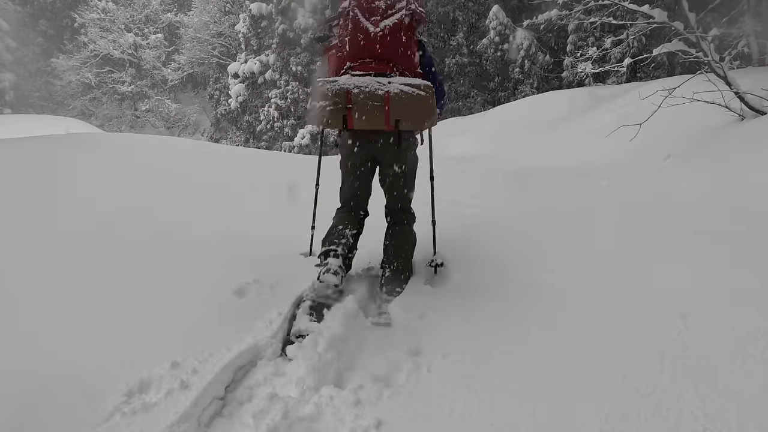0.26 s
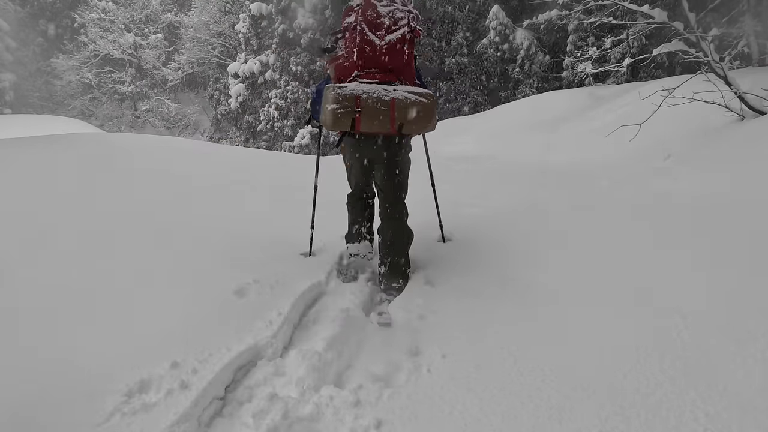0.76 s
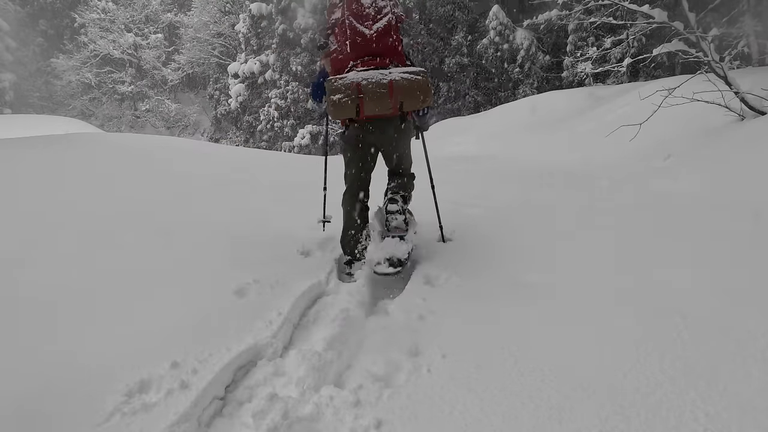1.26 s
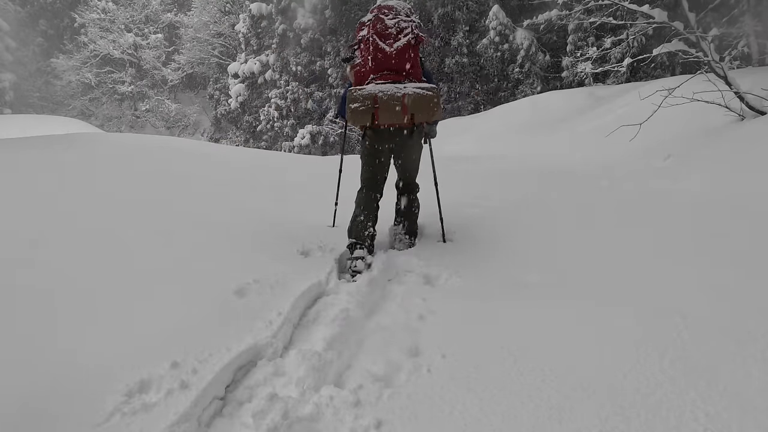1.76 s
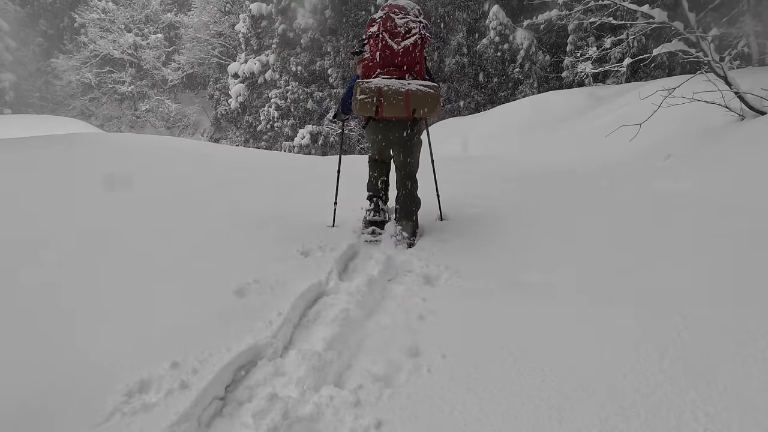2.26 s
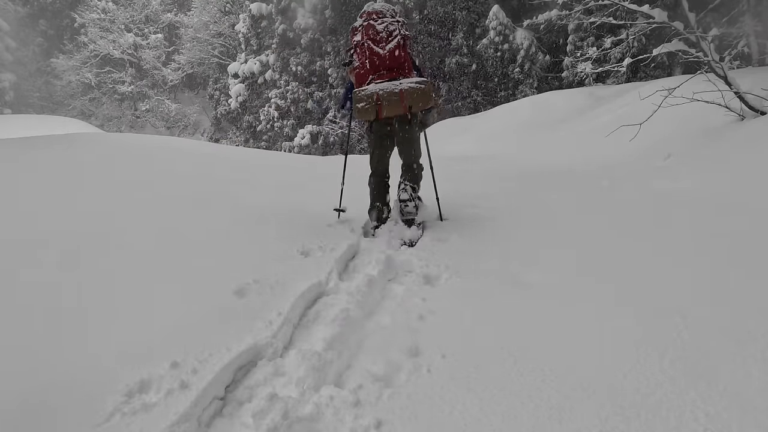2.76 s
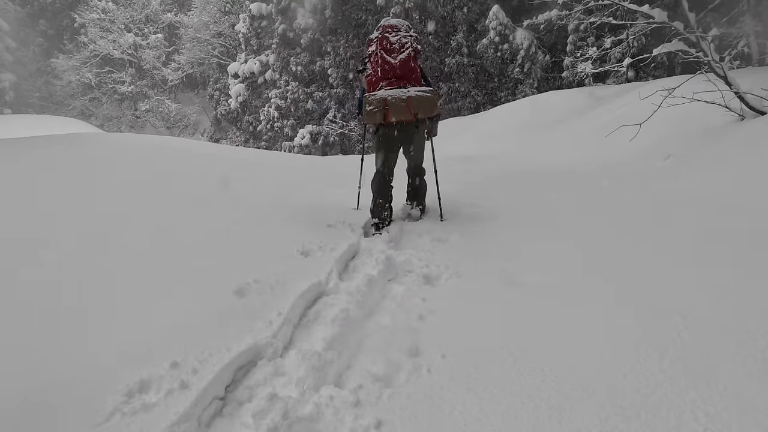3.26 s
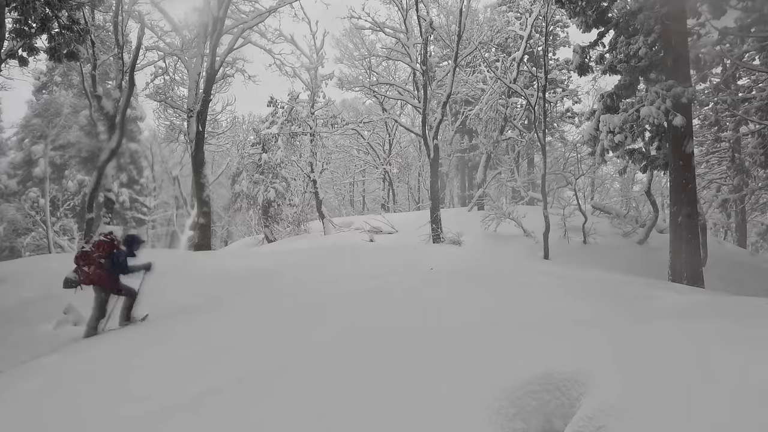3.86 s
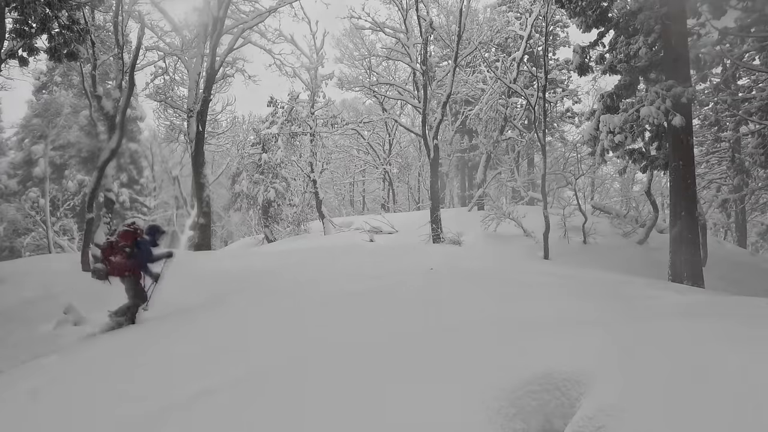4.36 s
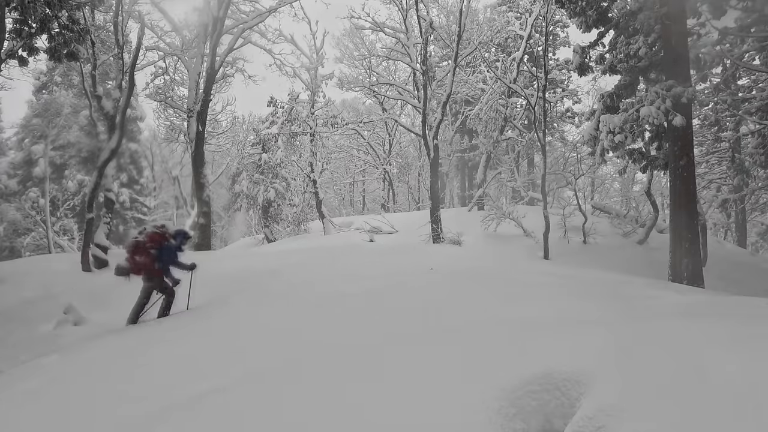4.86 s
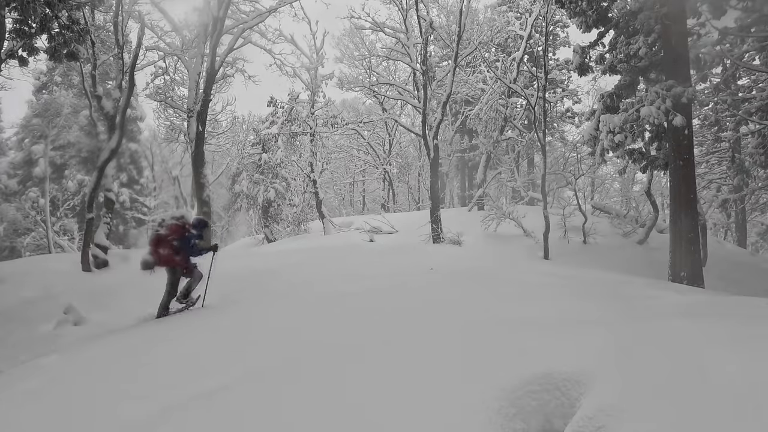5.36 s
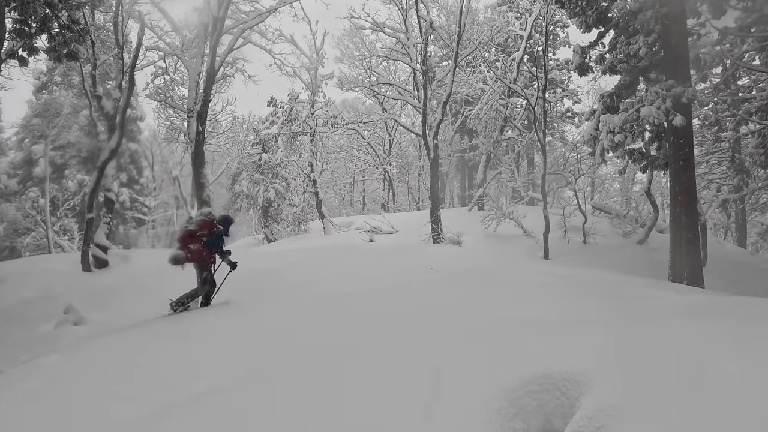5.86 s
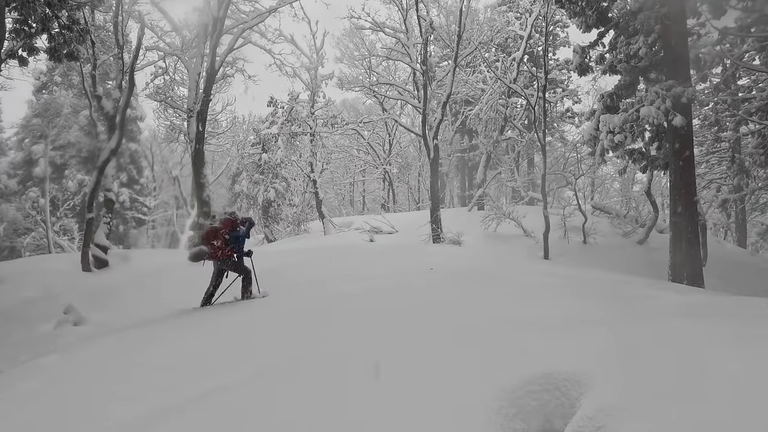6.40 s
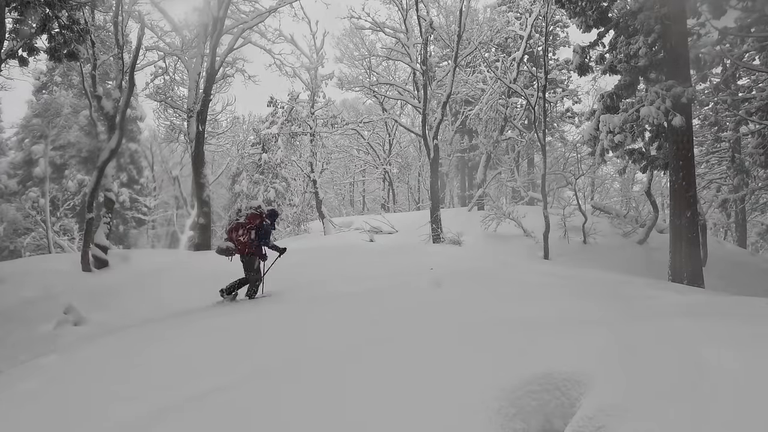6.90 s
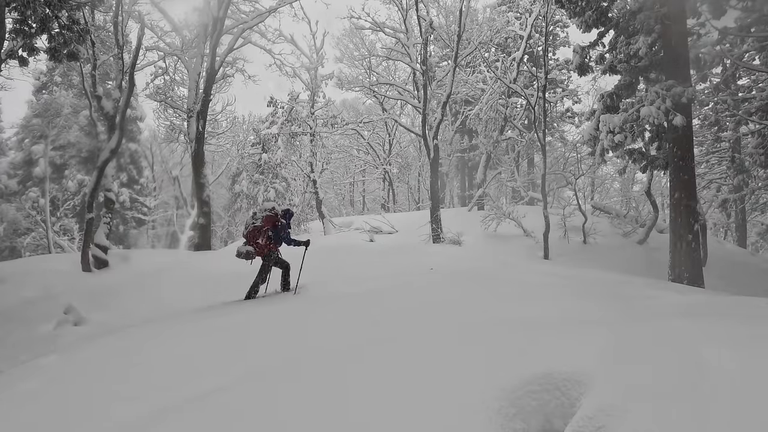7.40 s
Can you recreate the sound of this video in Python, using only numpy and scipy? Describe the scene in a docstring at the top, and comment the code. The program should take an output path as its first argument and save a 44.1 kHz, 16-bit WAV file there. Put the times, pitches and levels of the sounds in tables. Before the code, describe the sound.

Close to the microphone, snowshoes press slowly into deep powder, each step a deep bassy thump under a muffled, granular crunch. Snowfall hisses softly and clumps tick sharply on the microphone housing, with two dull knocks and a tiny chirp early on. After a soft fabric swish, the place changes abruptly to a distant wooded slope: very faint crunches, thinner hiss, small ticks and brief low wind rumbles. No echo.

```python
"""A hiker on snowshoes walks away through deep powder: each step is a deep thump under a muffled crunch. The
steps are runs of small collapses made from filtered clicks; larger slumps are single low swings. Snow hisses
all around as filtered noise; clumps tick on the microphone's housing and ring it, and his poles knock dully now
and then. A tiny chirp comes early, and a soft swish of fabric just before the place changes. Then, at once, he
is far off on a wooded slope: faint steps, a thinner hiss, more ticks and rumbling gusts."""
import sys
import numpy as np
from scipy import signal
from scipy.fft import rfft, irfft, next_fast_len
from scipy.io import wavfile
from scipy.ndimage import uniform_filter1d

SR = 44100
rng = np.random.default_rng(int(sys.argv[2]) if len(sys.argv) > 2 else 0)


def log_audio(samples):
    """Write samples as a 16-bit WAV file to the path given in sys.argv[1]."""
    # one column per channel
    frames = np.atleast_2d(samples).T
    # limit to full scale, then quantise
    limited = np.clip(frames, -1, 1)
    pcm = np.round(limited * 32767).astype(np.int16)
    wavfile.write(sys.argv[1], SR, pcm)


N = 336924
TIME = np.arange(N) / SR  # seconds
SLOPE_S = 3.585  # the trail gives way to the far slope
TOP_HZ = 15800  # nothing much is heard above this

# Near steps, levels before the trims in near_steps: touch_down_s, press_s (to about full weight),
# rest_s (from there to rest), thump_db, crunch_db, swish_db, touch_db (against full weight),
# ease_db (change after touch-down)
NEAR_STEPS = [ (-0.01, 0.091, 0.14, -21, -28, -50.5, -15.5, 4),
              (0.769, 0.12, 0.014, -23.5, -30.5, -43, -8, -5.5),
              (1.629, 0.11, 0.049, -26, -34, -41.5, -1, -6),
              (2.407, 0.22, 0.033, -25, -33.5, -49, -8.5, -7.5),
              (3.23, .13, 0.025, -28.5, -36.5, -45.5, -6.5, -2)]
# Snow giving way under a snowshoe, before the trim in slumps: centre_s, peak_db, pitch_hz
SLUMPS = [(0.056, -11.5, 43), (0.096, -16.5, 86), (0.136, -20, 67), (0.174, -31, 108), (0.846, -25, 62),
          (0.878, -15, 81.5), (1.657, -22, 115), (1.718, -19.5, 55), (1.77, -20.5, 80), (2.523, -21.5, 143),
          (2.598, -29, 65), (2.617, -20.5, 85), (3.246, -24.5, 265), (3.33, -26, 40.4), (3.367, -22.5, 80)]
# Faint steps on the slope, before the trim in far_steps: centre_s, length_s, crunch_db
FAR_STEPS = [(3.66, 0.061, -66), (4.024, 0.026, -53.5), (4.203, 0.026, -59), (4.556, 0.029, -55),
             (4.759, 0.032, -59), (5.21, 0.12, -70), (5.599, .035, -58), (5.717, 0.085, -60.5),
             (6.219, 0.054, -66), (6.612, 0.032, -54.5), (6.72, 0.053, -54), (6.917, 0.11, -66.5),
             (7.298, .06, -66.5), (7.6, 0.085, -58)]
# Snow striking the housing, before the grille: start_s, level_db, contact_s, ring_hz (of the struck spot),
# body_db and thud_db (both relative to level_db)
TICKS = [(0.044, -47, 0.0086, 1010, 11, 9), (0.0676, -18, 0.0029, 3100, -14, -10.5),
         (.1029, -27.5, 0.0041, 3500, -12, -18), (.235, -38, 0.00099, 5100, -6.5, -10),
         (0.2755, -49, 0.0082, 7300, -18, -23), (0.2866, -37.5, .0024, 4000, -19, -28),
         (.2953, -43.5, 0.0017, 7750, -5, -2), (0.4088, -46, 0.0053, 4400, -0.5, -2),
         (0.5638, -50, 0.0014, 1660, 2, -1), (0.5716, -47, 0.0014, 5000, -1.5, -2),
         (0.7665, -48.5, .0087, 1100, 13.5, -10), (.8559, -28, 0.004, 5200, -2, -25),
         (0.9633, -30.5, 0.0041, 3930, -3, -7.5), (.9759, -55, 0.00062, 4370, -11, -5),
         (1.0733, -42.5, 0.0013, 5600, -5, -12), (1.0781, -37.5, 0.0018, 5800, -15, -11),
         (1.1228, -43, 0.0043, 5640, -1, -4), (1.1385, -43, 0.0016, 5800, -17, -13),
         (1.1525, -35, 0.0089, 4960, -6, -7.5), (1.488, -50.5, 0.0049, 1090, 3.5, -5),
         (1.6567, -36.5, 0.0031, 5760, -0.5, -14), (1.9494, -41.5, 0.0034, 1480, -1, -8),
         (1.956, -46, 0.0042, 2860, -1, -22), (1.9911, -54.5, .001, 7940, -7, -17),
         (2.0686, -35, 0.0016, 5070, -7, -9.5), (2.181, -49, 0.0046, 5400, 1.5, -8),
         (2.403, -52, .0054, 1746, 12.5, -4), (2.413, -43.5, 0.0045, 2900, -11, 3.5),
         (2.6011, -40.5, 0.0018, 5670, -1.5, -22), (2.6308, -28.5, 0.0033, 4400, -4.5, -6.5),
         (2.747, -50, 0.0057, 1310, 6.5, -13), (2.9628, -34, 0.003, 4180, -2.5, -16),
         (3.0223, -44.5, 0.0013, 5570, -9, -28), (3.036, -44.5, 0.0062, 4500, -2, -8),
         (3.201, -58.5, .001, 7400, -12, -20), (3.2223, -51.5, 0.0028, 1850, 10.5, -9),
         (3.3046, -46.5, 0.0018, 5900, 2, -1), (3.361, -48.5, 0.0015, 7760, -22, -19),
         (3.502, -34.5, .0045, 7800, -6.5, -4.5), (3.566, -48.5, .0007, 5000, -10, -19),
         (3.6141, -42, 0.00054, 6400, -2, -12), (3.713, -46.5, 0.00032, 2350, 5.5, -8),
         (3.7424, -41.5, 0.0045, 1960, 3.5, -3), (3.8491, -56.5, .0011, 6340, -15, -14),
         (3.932, -49, 0.00062, 2530, -7, -13), (3.9647, -46.5, 0.0017, 7100, 0, -25),
         (3.9723, -45.5, 0.00042, 4670, -1, -37), (4.0862, -58, 0.00057, 7300, 3, -26),
         (4.1275, -49.5, 0.0007, 5800, -7, -28), (4.2507, -55.5, 0.00077, 7460, -16, -19),
         (4.3014, -53, 0.00058, 4660, -3, -33), (4.308, -50, 0.00068, 7550, 1, 4),
         (4.3694, -50, 0.0017, 4430, -5, -25), (4.4063, -43.5, 0.00076, 4230, -2.5, -11),
         (4.5467, -55, 0.0044, 5550, 5, 9), (4.5906, -62.5, 0.00075, 7500, -1, 6),
         (4.7167, -47.5, 0.0094, 5900, -2.5, -0.5), (4.956, -53.5, 0.00052, 6300, -4.5, -22),
         (4.975, -55, 0.0016, 7300, -10, -16), (5.0375, -57.5, .0005, 7850, -16, -24),
         (5.15, -43.5, 0.0027, 2480, 0, -28), (5.2009, -45, 0.0011, 1900, 1.5, -2),
         (5.394, -57, 0.0022, 1890, 6.5, -22), (5.46, -51.5, 0.0018, 7500, 1.5, 1),
         (5.4868, -46.5, 0.00055, 4650, -16, 0.5), (5.5278, -63.5, .0014, 1900, 15, 13.5),
         (5.5598, -35.5, .0008, 4240, -10.5, -3.5), (5.6723, -37, 0.00053, 5530, -9, -1),
         (5.7347, -47, 0.001, 5600, -1, 0), (5.9783, -40.5, 0.0025, 1140, 6.5, 7.5),
         (6.0115, -51, 0.0035, 4310, -10, -25), (6.0193, -46, 0.0012, 7600, 8, 6),
         (6.1437, -42.5, .0025, 2720, -11, -7.5), (6.157, -54.5, 0.0024, 6200, 1, -20),
         (6.1898, -50.5, 0.0017, 2730, -8, -21), (6.2445, -57, .0015, 4750, 1, -13),
         (6.3909, -55, 0.0021, 3260, 2.5, -10), (6.6397, -43.5, 0.0047, 5000, -3, -5.5),
         (6.656, -49, 0.0023, 7200, -18, -15), (6.9275, -41.5, 0.0013, 7840, 4, -15),
         (6.9674, -45.5, 0.0033, 2100, 2, -4), (6.99, -65.5, .0026, 1180, 13, 11),
         (7.021, -52, 0.00049, 2300, 5, 0.5), (7.1582, -60, .0031, 1280, 14.5, 18),
         (7.1763, -49, 0.0045, 4700, -1, -19), (7.203, -52, 0.0032, 3300, -6, -28),
         (7.2581, -49, .0031, 1020, 3.5, -1), (7.2757, -51, 0.0053, 5230, -5, -20),
         (7.2834, -47, 0.0014, 1350, 7.5, -10), (7.563, -55.5, 0.0033, 5430, 1, -13)]
# Edges of the thud, body, main and top bands of a tick: edge_hz
TICK_EDGES_HZ = [450, 900, 2700, 6000, 14000]
# Small hard grains ring high and sparkle, wet ones do not: ring_hz, top_db (relative to the tick),
# spot_db (strength of the struck spot's ring)
TICK_TONE = [(1130, -0.5, -21.5), (1900, -0.5, -9), (2420, -5, -12), (3100, -13.5, -7), (3470, -15, -25.5),
             (4400, -3, -9), (5000, -4, -15), (5800, 1.5, -29), (7800, 10, -24.5)]
# Ringing notes of the housing: pitch_hz, level_db (relative), t60_s (time to fade by 60 dB)
HOUSING = [(627, 11.5, 0.046), (1218, -15.5, 0.11), (1864, 0, 0.032), (2535, -1, 0.024), (3780, -20, 0.14),
           (5000, 6, 0.01), (7400, -12.5, 0.038)]
# The grille in front of the microphone shades the ticks: pitch_hz, level_db
GRILLE = [(300, -13.5), (550, -3), (1000, 6), (1800, 0.5), (2400, 0), (3100, 2), (4000, 1), (5400, 4.5),
          (6500, -4), (8000, 2), (16000, -6.5)]
# Dull knocks of the hiker's poles: start_s, thud_db, thud_top_hz, ring_hz, ring_db, ring_t60_s
KNOCKS = [(1.262, -11, 2210, 600, -31, 0.055), (1.7708, -12, 1830, 930, -23, 0.016),
          (4.545, -54, 900, 442, -34, 0.082)]
# Wind on the microphone: time_s, level_db
WIND = [(3.6, -77), (3.79, -84), (4.21, -50.5), (4.31, -55), (4.35, -50), (4.74, -58), (4.87, -45),
        (5.52, -74), (5.69, -51.5), (5.95, -75), (6.22, -65), (6.32, -77), (6.57, -75), (6.61, -35.5),
        (6.76, -69.5), (7.25, -74), (7.62, -65), (7.64, -81)]
# Tone colours, low to high, all with the columns: pitch_hz, level_db (relative)
THUMP_COLOUR = [(12, -34), (22, 0.5), (38, 7.5), (62, 2), (105, 0.5), (135, -1.5), (200, -14.5), (400, -48)]
CRUNCH_COLOUR = [(70, -67), (140, 5.5), (220, -0.5), (330, -6.5), (500, -13), (800, -14.5), (1500, -27.5),
                 (3000, -29.5)]
SWISH_COLOUR = [(400, -20), (900, -12), (1800, -0.5), (2800, -19), (5000, -19), (10000, -35)]
FLAKE_COLOUR = [(400, -32), (620, 1.5), (850, -3), (1700, 7.5), (2800, -5.5), (5000, 6.5), (7500, 1.5),
                (10000, -15.5), (15000, -35)]
TRAIL_AIR = [(25, 0), (112, -19), (145, 5), (190, 5), (245, -0.5), (400, -6.5), (700, -2.5), (1000, 2.5),
             (1900, 1.5), (2500, -4), (4200, -5), (5200, -6.5), (7700, -11.5), (10500, -31), (12700, -33),
             (14000, -70)]
SLOPE_AIR = [(30, -1), (122, -19), (165, 6), (280, -10), (490, 3.5), (820, -18), (1000, -2), (1800, -4.5),
             (2500, -16.5), (3400, -16), (4900, -8.5), (5900, -17), (7400, -14), (9500, -30.5),
             (15000, -62)]
GUST_COLOUR = [(12, 1), (24, 6.5), (40, -4.5), (60, -17), (85, -26.5), (125, -29.5), (250, -38)]
# Stereo width of the hiss in each place: pitch_hz, side_db (side minus middle)
TRAIL_WIDTH = [(60, -17), (130, 0), (300, -2.5), (700, -14), (1400, -8), (2600, -10), (4500, -8.5),
               (8000, -18), (14000, 10)]
SLOPE_WIDTH = [(60, 0), (150, 5.5), (500, -32), (1400, -11), (2600, 8.5), (4500, -7), (8000, -38),
               (14000, 29)]
# The two microphone ports differ: pitch_hz, difference_db (left minus right), left_lead_radians
PORTS = [(100, -1, .03), (600, -.5, .55), (1100, 0, .65), (1700, 1.3, .1), (2400, 3.5, -1.3),
         (3100, 2, -.85), (4400, -3.7, 0), (5800, -2, 0), (7800, 1.5, 0), (12000, 3, 0)]

# Every near step: time to bite, to fall silent under the full weight, and for loose snow to settle
BITE_S, RELEASE_S, SETTLE_S = 0.011, 0.042, 0.11
# Against full weight: the load at rest, and loose snow stirring before and after
REST_DB, STIR_DB = -8.5, -29.5
# Hiss of the snowfall: level at the start of the trail, its fall, level on the slope
TRAIL_HISS_DB, TRAIL_FADE_DB_PER_S, SLOPE_HISS_DB = -49.5, 1.0, -61.5
# Fine patter of flakes
TRAIL_PATTER_DB, SLOPE_PATTER_DB = -60, -67


def undb(db):
    """Turn decibels into a plain gain."""
    return 10 ** (np.asarray(db) / 20)


def unit(x):
    """Scale a sound to an average (rms) level of 1."""
    return x / np.sqrt(np.mean(x ** 2) + 1e-30)


def curve(rows):
    """Gain over time from (time_s, level_db) rows, silent outside them."""
    return undb(np.interp(TIME, *np.transpose(rows), left=-150, right=-150))


def swell(s, length_s):
    """A smooth rise and fall around time s."""
    return np.exp(-((TIME - s) / length_s) ** 2)


def colour(x, points, lead=0):
    """Filter by (pitch_hz, level_db) points, fading out above the last; lead turns the phase at each."""
    hz, db = np.transpose(points)
    size = next_fast_len(len(x) + SR // 10)
    bins = np.maximum(np.fft.rfftfreq(size, 1 / SR), 1)
    gain = undb(np.interp(np.log(bins), np.log(hz), db))
    gain = gain / np.maximum(bins / hz[-1], 1) ** 4
    turn = np.exp(1j * np.interp(bins, hz, lead)) if np.ndim(lead) else 1
    return irfft(rfft(x, size) * gain * turn, size)[:len(x)]


def band(x, lo_hz, hi_hz, order=2):
    """Keep only the pitches between two limits."""
    edges = [lo_hz, min(hi_hz, SR / 2 - 1)]
    return signal.sosfilt(signal.butter(order, edges, "band", fs=SR, output="sos"), x)


def ring(t, hz, t60):
    """One struck note: a sine that fades by 60 dB in t60 seconds."""
    return np.sin(2 * np.pi * hz * t) * np.exp(-np.log(1000) * t / t60)


def walk(rate):
    """Random wander through a fresh value `rate` times a second."""
    knots = rng.standard_normal(4096)
    return np.interp(TIME * rate, np.arange(len(knots)), knots)


def grains(rate, spread_db):
    """Random clicks, `rate` a second on average, most small and a few large."""
    size = undb(spread_db * np.minimum(rng.exponential(size=N), 4))
    return (rng.random(N) < rate / SR) * size * rng.choice([-1, 1], N)


def even(x, span_s):
    """Hold the level near 1 over each span, keeping the faster texture."""
    return x / np.sqrt(uniform_filter1d(x ** 2, int(span_s * SR)) + np.mean(x ** 2) / 1000)


def stereo(mid, side):
    """Left and right from middle and side."""
    return np.array([mid + side, mid - side])


def add(out, s, sound):
    """Mix a sound in at time s."""
    start = max(int(s * SR), 0)
    part = sound[..., :max(N - start, 0)]
    out[..., start:start + part.shape[-1]] += part


def tread(s, press_s, rest_s, touch_db, ease_db):
    """Load of one step: the shoe stirs the powder, bites, eases, takes the weight, rests; snow settles."""
    gaps_s = [0, SETTLE_S, BITE_S, press_s / 4, press_s / 5, press_s / 5, press_s / 3,
              rest_s, RELEASE_S, SETTLE_S]
    load_db = [2 * STIR_DB, STIR_DB, touch_db, touch_db, touch_db + ease_db, touch_db / 2, 0,
               REST_DB, STIR_DB, 2 * STIR_DB]
    times_s = s - SETTLE_S - BITE_S + np.cumsum(gaps_s)
    return curve(np.c_[times_s, load_db])


def near_steps(thump_db=-2, crunch_db=-0.5, swish_db=-2, side_db=-18, thump_lag_s=0.0057,
               scuff_db=2, scuff_s=.02, refill_db=-51, refill_after_s=0.093, refill_s=0.031):
    """Weight packs powder in small, muffled collapses; loose snow brushes the deck and refills the print."""
    thump = crunch = swish = 0  # loudness over time of each layer
    for s, press_s, rest_s, step_thump_db, step_crunch_db, step_swish_db, touch_db, ease_db in NEAR_STEPS:
        load = tread(s, press_s, rest_s, touch_db, ease_db)
        late_load = tread(s + thump_lag_s, press_s, rest_s - thump_lag_s, touch_db, ease_db)
        scuff = undb(scuff_db) * swell(s + scuff_s / 2, scuff_s)
        refill = undb(refill_db) * swell(s + press_s + rest_s + refill_after_s, refill_s)
        thump = thump + undb(step_thump_db) * late_load
        crunch = crunch + undb(step_crunch_db) * np.hypot(load, scuff / 2) + refill
        swish = swish + undb(step_swish_db) * np.hypot(load / 2, scuff)
    low = even(colour(grains(260, 0.95), THUMP_COLOUR), 0.05) * thump * undb(thump_db)
    mid, side = (even(colour(grains(700, 2.6), CRUNCH_COLOUR), 0.0356) * crunch * undb(crunch_db)
                 for _ in range(2))
    brush = even(colour(grains(640, 5.6), SWISH_COLOUR), 0.036) * swish * undb(swish_db)
    return stereo(low + mid + brush, undb(side_db) * side)


def slumps(cycles=0.47, gain_db=-1):
    """A whole layer of snow drops: one smooth, low swing of pressure."""
    out = np.zeros(N)
    for s, db, hz in SLUMPS:
        turn = (TIME - s) * hz  # cycles away from the centre
        near = np.abs(turn) < 3
        swing = np.cos(2 * np.pi * (turn[near] + rng.random()))
        out[near] += undb(db + gain_db) * swing * np.exp(-(turn[near] / cycles) ** 2)
    return out


def far_steps(gain_db=-3.0, side_db=-9, thump_db=-7, brush_db=-6):
    """Up the slope a step is faint: a small thump, a low crunch and a brush of powder."""
    mid, side = (even(colour(grains(500, 5.4), CRUNCH_COLOUR), 0.025) for _ in range(2))
    low = undb(thump_db) * even(band(grains(260, 2), 81, 140), 0.048)
    brush = undb(brush_db) * even(band(grains(1500, 2.5), 350, 1800), .04)
    load = sum(undb(db) * swell(s, length_s) for s, length_s, db in FAR_STEPS)
    return stereo(mid + low + brush, undb(side_db) * side) * load * undb(gain_db)


def squeak(peak_db=-23, hz=5600):
    """A tiny high chirp: a sine a few thousandths of a second long."""
    return undb(peak_db) * swell(1.4705, .0016) * np.sin(2 * np.pi * hz * TIME)


def sleeve(level_db=-55):
    """A soft, high swish of band-limited noise, like shell fabric brushing past the pack."""
    fabric = unit(band(rng.standard_normal(N), 2500, 8300, order=5))
    return undb(level_db) * swell(3.125, .04) * fabric


def tick(contact_s, ring_hz, ring_db, levels_db, housing_db, crumbs_db=-19, side_db=-11):
    """A clump bursts on the housing and rings it; its crumbs patter after."""
    t = np.arange(SR // 14) / SR
    burst = np.exp(-(t / max(contact_s, 1 / SR)) ** 4) + undb(crumbs_db) * np.exp(-t / .005)
    crystals = burst * rng.choice([-1, 1], (2, len(t)))
    shares = rng.uniform(.5, 1.4, len(HOUSING))  # each place of impact favours other notes
    shell = undb(housing_db) * sum(share * undb(db) * ring(t, hz, t60)
                                   for share, (hz, db, t60) in zip(shares, HOUSING))
    spot = undb(ring_db) * ring(t, ring_hz, .005)  # the struck spot rings only briefly
    hit = signal.fftconvolve(crystals, [(t == 0) + shell + spot])[:, :len(t)]
    mid = side = 0
    for k, db in enumerate(levels_db):
        direct, scattered = band(hit, TICK_EDGES_HZ[k], TICK_EDGES_HZ[k + 1], order=3)
        if k == len(levels_db) - 1:  # soft snow has little at the very top
            direct, scattered = band([direct, scattered], 5740, 7670, order=2)
        gain = undb(db) * np.sqrt(.005 / t[-1])  # levels are averages (rms) over 5 ms
        mid = mid + gain * unit(direct)
        side = side + gain * unit(scattered) * undb(side_db - 2.2 * abs(k - 1))
    return stereo(mid, side)


def ticks(trail_housing_db=-46, slope_housing_db=-32):
    """The larger clumps strike; the housing rings more freely on the slope."""
    out = np.zeros((2, N))
    pitches, *tone = np.transpose(TICK_TONE)
    for s, db, contact_s, ring_hz, body_db, thud_db in TICKS:
        housing_db = trail_housing_db if s < SLOPE_S else slope_housing_db
        top_db, spot_db = (np.interp(ring_hz, pitches, column) for column in tone)
        levels_db = db + np.array([thud_db, body_db, 0, top_db])
        add(out, s, tick(contact_s, ring_hz, spot_db, levels_db, housing_db))
    return np.array([colour(x, GRILLE) for x in out])


def knocks(push_s=0.00026, low_hz=125, crumble_db=-14, crumble_s=0.0061):
    """Dull knocks: a very short push and a brief crumble, kept below thud_top_hz, with one low ringing note."""
    out = np.zeros(N)
    t = np.arange(SR // 10) / SR
    for s, db, thud_top_hz, hz, ring_db, t60 in KNOCKS:
        crumble = undb(crumble_db) * np.exp(-t / crumble_s) * rng.standard_normal(len(t))
        thud = band(np.exp(-t / push_s) + crumble, low_hz, thud_top_hz, order=4)
        add(out, s, undb(db) * thud / np.abs(thud).max() + undb(ring_db) * ring(t, hz, t60))
    return out


def flakes(rate=130, spread_db=2.5, flurry_db=-62, flurry_s=0.035, flurry_lag_s=0.018, side_db=-12):
    """Flakes land close by, each a faint short crackle; a small flurry comes with every larger clump."""
    t = np.arange(SR // 100) / SR
    crumble = np.exp(-t / .0014)
    landings = signal.fftconvolve(np.abs(grains(rate, spread_db)), crumble)[:N]
    mid, side = (even(colour(landings * rng.standard_normal(N), FLAKE_COLOUR), 0.173) for _ in range(2))
    steady = undb(np.where(TIME < SLOPE_S, TRAIL_PATTER_DB, SLOPE_PATTER_DB))
    flurries = np.sqrt(sum(swell(row[0] + flurry_lag_s, flurry_s) for row in TICKS))
    return stereo(mid, undb(side_db) * side) * np.hypot(steady, undb(flurry_db) * flurries)


def air(points, width, flicker_db):
    """Wide hiss of snowfall and forest: coloured noise whose level can flicker."""
    mid, side = (colour(rng.standard_normal(N), points) * undb(flicker_db * walk(22)) for _ in range(2))
    return stereo(mid, colour(side, width)) / np.std(mid)


def snowfall():
    """The hiss thins slowly along the trail; on the slope it is fainter and flickers."""
    on_trail = undb(TRAIL_HISS_DB - TRAIL_FADE_DB_PER_S * TIME) * air(TRAIL_AIR, TRAIL_WIDTH, flicker_db=0.0)
    on_slope = undb(SLOPE_HISS_DB) * air(SLOPE_AIR, SLOPE_WIDTH, flicker_db=2.9)
    return np.where(TIME < SLOPE_S, on_trail, on_slope)


def wind():
    """Light gusts rumble on the microphone: low noise that rises and falls."""
    return even(colour(rng.standard_normal(N), GUST_COLOUR), 0.07) * curve(WIND)


def scene():
    """Hiker, falling snow and wind together; soft snow all round gives no echo."""
    hiker = near_steps() + slumps() + far_steps() + squeak() + sleeve()
    snow = ticks() + knocks() + flakes() + snowfall()
    return hiker + snow + wind()


def record(dry):
    """Each port has its own colour and phase; the recorder rounds the highest peaks and cuts the top."""
    hz, db, lead = np.transpose(PORTS)
    # each port takes half of the difference, in opposite directions
    ports = np.array([colour(x, np.c_[hz, sign * db / 2], sign * lead / 2)
                      for x, sign in zip(dry, (1, -1))])
    rounded = .7 * np.tanh(ports / .7)
    return signal.sosfilt(signal.ellip(8, .2, 70, TOP_HZ, fs=SR, output="sos"), rounded)


dry = scene()
out = record(dry)
log_audio(out)
```